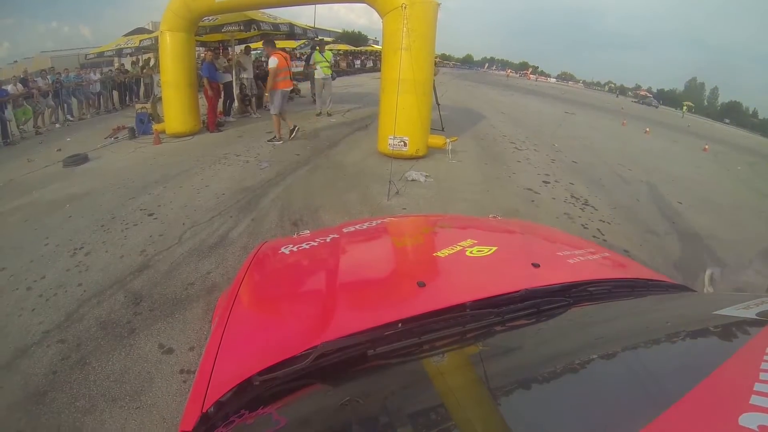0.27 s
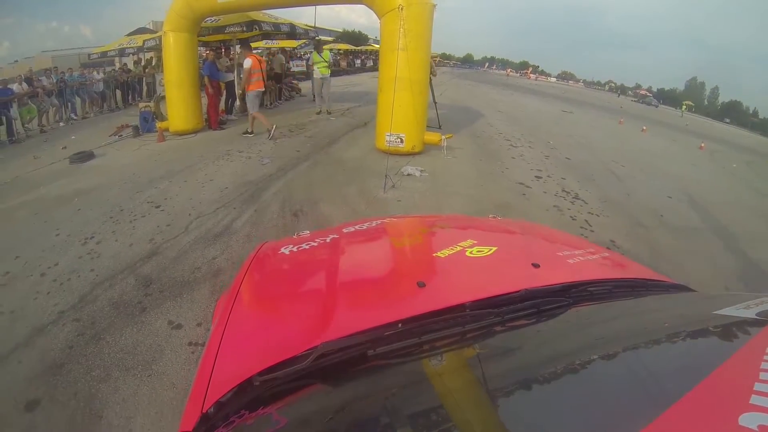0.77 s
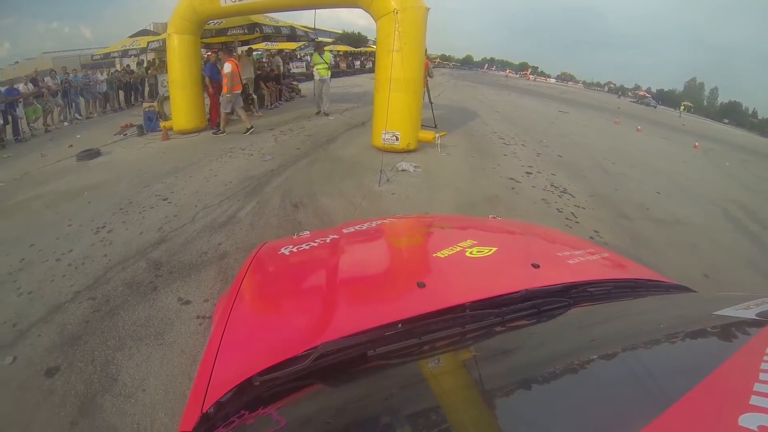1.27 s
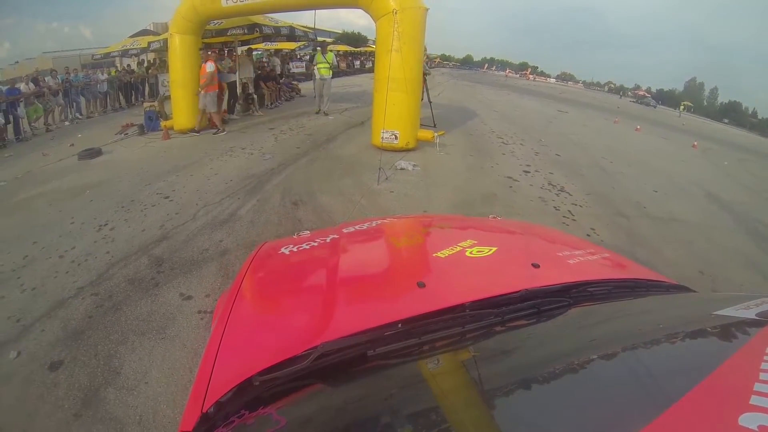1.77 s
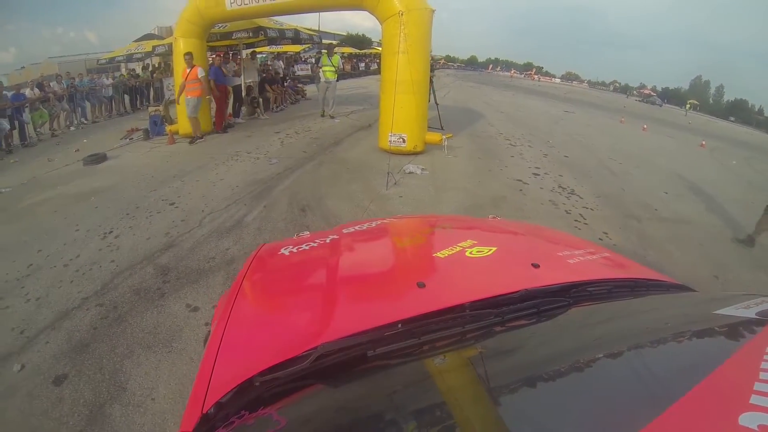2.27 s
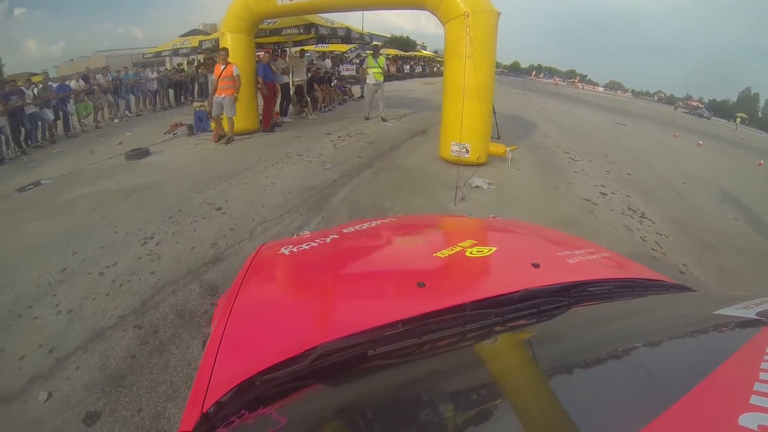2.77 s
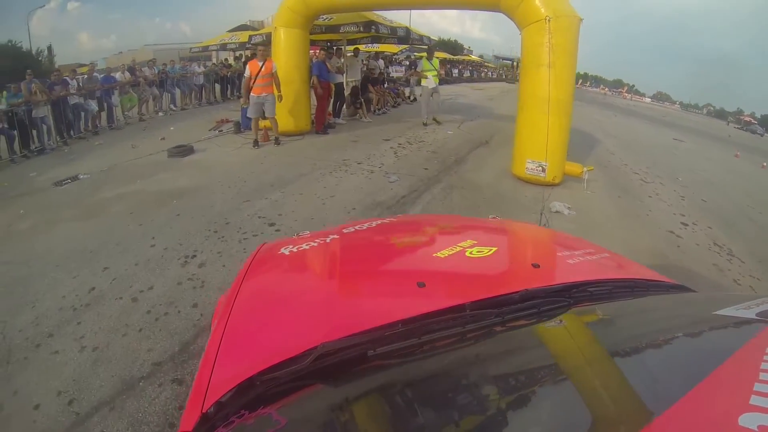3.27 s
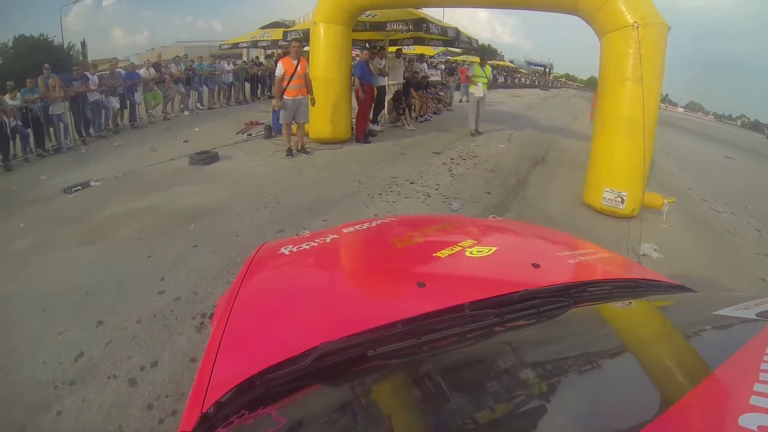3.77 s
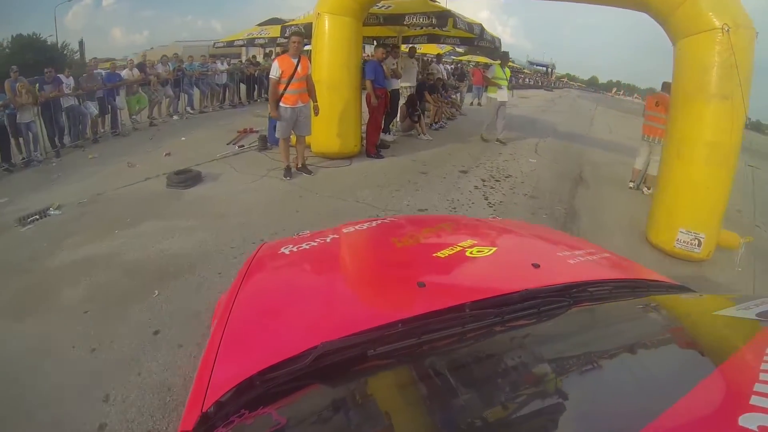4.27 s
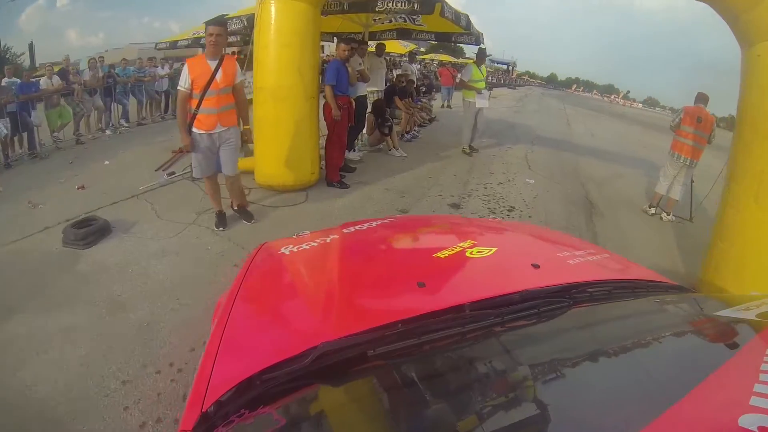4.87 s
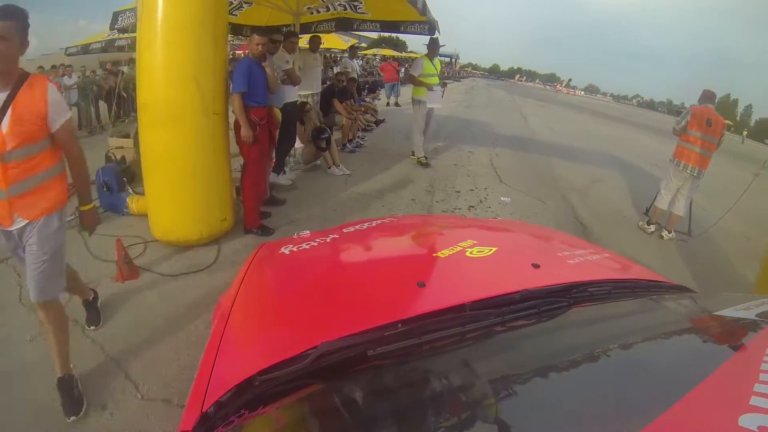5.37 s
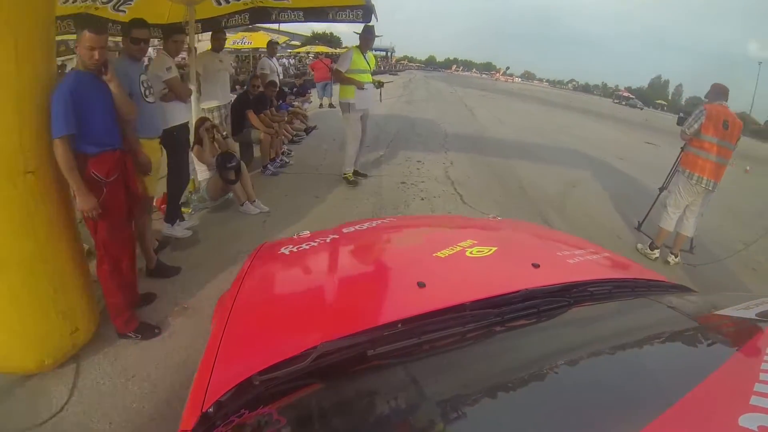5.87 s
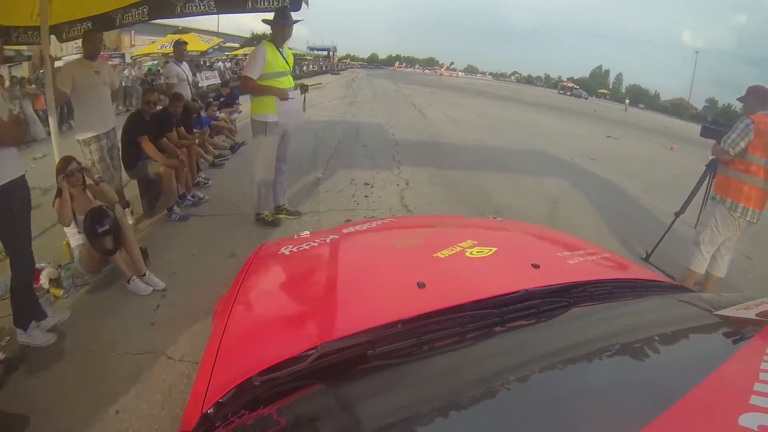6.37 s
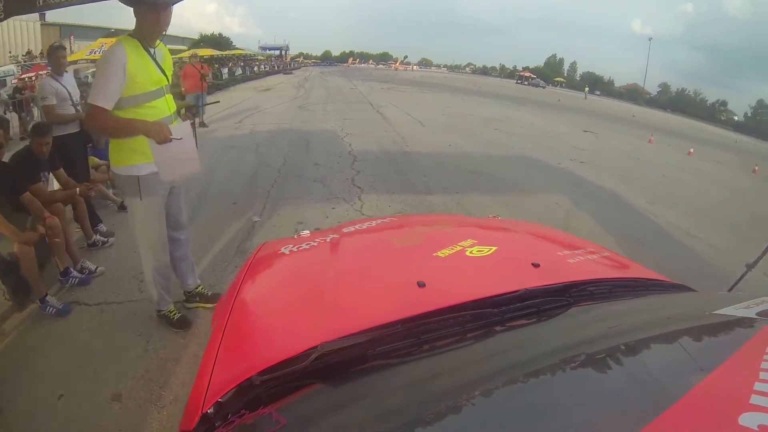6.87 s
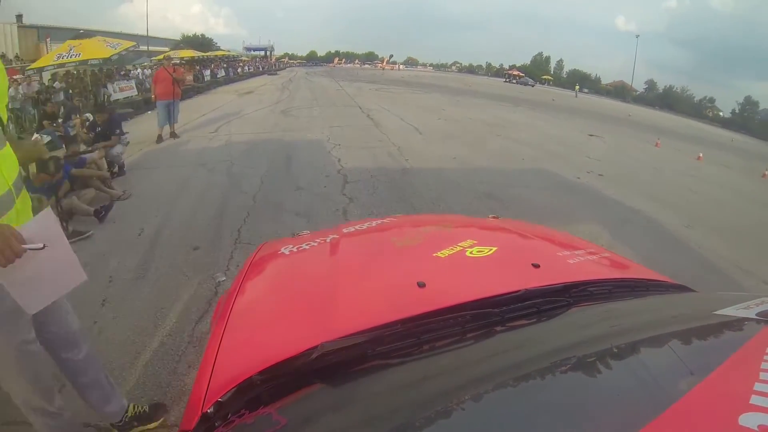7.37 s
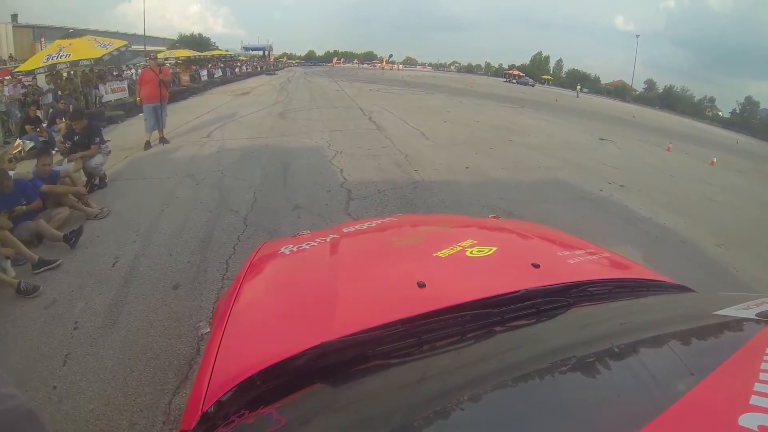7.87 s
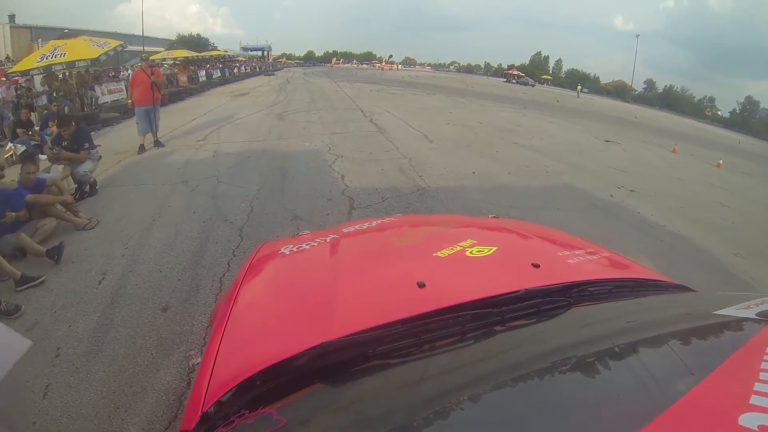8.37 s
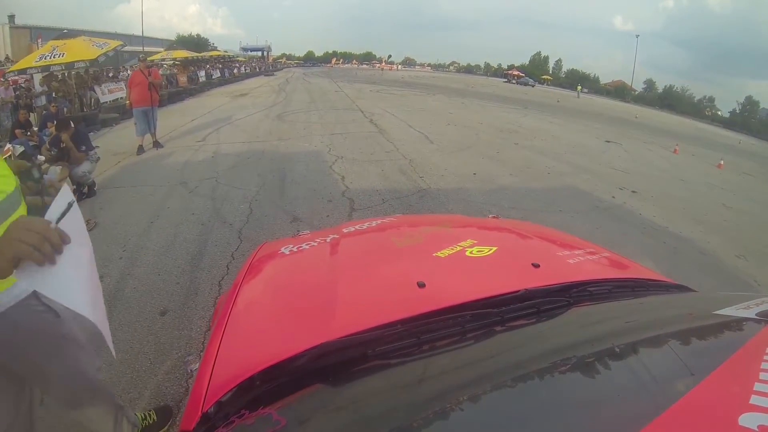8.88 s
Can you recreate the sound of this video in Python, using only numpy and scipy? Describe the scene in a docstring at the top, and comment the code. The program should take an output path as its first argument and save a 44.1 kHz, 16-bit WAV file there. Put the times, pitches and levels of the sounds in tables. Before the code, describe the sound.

A V8 engine surges and relaxes repeatedly as the car creeps forward on rough asphalt. Low body resonance and rumble dominate, with faint blower whine, intake roar and dry tyre friction on top. Around the middle the tyres scrape harder and squeal briefly; a band of fan noise swells by. After one last loud blip the revs fall to quiet, lumpy idling. Close, enclosed roof microphone, open air.

```python
"""A supercharged V8 creeps forward on asphalt: pitch-gliding sines give its blower whine and exhaust boom,
firing pulses ring the body shell, and filtered noise gives intake roar, road rumble and tyre scrub.
It is blipped five times; clicks of grit and thin arched sine squeals come and go, and at 5.5 s
the fan of an inflated arch, a band of noise, swells past. After the last blip the revs drop to idle.
All is heard at a sealed camera on the roof."""
import sys
import numpy as np
from scipy import signal
from scipy.fft import rfft, irfft, next_fast_len
from scipy.io import wavfile
from scipy.ndimage import uniform_filter1d

SR = 44100
rng = np.random.default_rng(int(sys.argv[2]) if len(sys.argv) > 2 else 0)


def master(y):
    """Save y as 16-bit WAV."""
    cut = np.clip(np.atleast_2d(y).T, -1, 1)
    pcm = np.round(cut * 32767)  # scale
    wavfile.write(sys.argv[1], SR, pcm.astype(np.int16))


N = 402191

# Low modes of the body shell. Each row: frequency in Hz, bandwidth in Hz, relative level in dB.
SHELL_MODES = [(42.4, 32, -10.5), (68, 12.6, -3.5), (94.56, 4.74, 5), (117.55, 4.57, 5.5), (153, 10.4, -1),
               (184, 29, -4.5), (254.8, 18.8, -5.5), (294.2, 24.3, -12.5)]
# Lower resonances of the camera case. Each row: frequency in Hz, bandwidth in Hz, relative level in dB.
CASE_LOW_MODES = [(1500, 93, 6), (2300, 120, 3.5), (2470, 23, -3.5), (2760, 220, -8.5), (3127, 84, -6.5),
                  (3170, 120, -9), (3385, 59, -6), (3975, 64, -13)]
# Upper resonances of the camera case. Each row: frequency in Hz, bandwidth in Hz, relative level in dB.
CASE_HIGH_MODES = [(4660, 310, 3.5), (5740, 350, -5.5), (7770, 1030, 4.5), (9380, 1800, -13),
                   (9840, 2400, -6.5), (12800, 370, -12.5), (13900, 940, -10)]


def from_db(db):
    """Amplitude ratio of a level: twenty decibels for each factor of ten."""
    return 10 ** (np.asarray(db) / 20)


def rms_one(x):
    """Normalisation to unit root-mean-square amplitude."""
    return x / np.sqrt(np.mean(x ** 2) + 1e-20)


def in_time(rows):
    """Linear interpolation of table columns over their first, time in seconds; one value a sample."""
    s, *columns = np.transpose(rows)
    return [np.interp(np.arange(N) / SR, s, column) for column in columns]


def drift(rate_hz):
    """Random modulation of unit rms: white noise through a double-pole low-pass at rate_hz."""
    step = 40   # samples between computed values
    r = np.exp(-2 * np.pi * rate_hz * step / SR)
    white = rng.standard_normal(N // step + 2002)
    slow = signal.lfilter([1], [1, -2 * r, r * r], white)[2000:]   # the start-up is dropped
    return np.interp(np.arange(N) / step, np.arange(len(slow)), rms_one(slow))


def coloured(x, spectrum):
    """Spectral shaping: multiplication by a (Hz, dB) curve, straight over log frequency."""
    size = next_fast_len(N)
    hz, db = np.transpose(spectrum)
    log_hz = np.log(np.arange(size // 2 + 1) * SR / size + 1)   # 1 Hz added to keep the log finite
    gain = from_db(np.interp(log_hz, np.log(hz), db, left=-90))
    return irfft(rfft(x, size) * gain, size)[:N]


def noise(spectrum, flicker_db, rate_hz):
    """Amplitude-modulated noise: white noise of flickering level, coloured and set to unit rms."""
    white = rng.standard_normal(N) * from_db(flicker_db * drift(rate_hz))
    return rms_one(coloured(white, spectrum))


def tone(hz, db):
    """Frequency modulation: a sine whose phase integrates a moving pitch, at an rms level in dB."""
    return np.sqrt(2) * from_db(db) * np.sin(2 * np.pi * np.cumsum(hz) / SR)


def butterworth(x, order, hz, kind="low"):
    """Maximally flat filtering with cutoffs in Hz."""
    return signal.sosfilt(signal.butter(order, hz, kind, fs=SR, output="sos"), x)


def resonate(x, modes, sign=1):
    """Modal superposition of two-pole resonators; like signs leave notches between, sign -1 fills them."""
    out = 0
    for k, (hz, width_hz, db) in enumerate(modes):
        r = np.exp(-np.pi * width_hz / SR)
        poles = [1, -2 * r * np.cos(2 * np.pi * hz / SR), r * r]
        zeros = [(1 - r * r) / 2, 0, (r * r - 1) / 2]
        out = out + sign ** k * from_db(db) * signal.lfilter(zeros, poles, x)
    return out


def shell(x):
    """Modal ringing of the body shell: a few low modes under a steep low-pass."""
    return butterworth(resonate(x, SHELL_MODES, sign=-0.97), 6, 345)


def boom(x):
    """Resonance under steady tones: they swell on each shell mode; the two strongest cancel between them."""
    ringing = resonate(x, SHELL_MODES[:4]) - resonate(x, SHELL_MODES[4:], sign=-1.01)
    return butterworth(ringing, 6, 320)


def controls():
    """Throttle as a first-order lag behind the rate at which the revs climb, with whine pitch and load."""
    # Engine speed, heard as the blower's whine, and load on the crank.
    # Each row: time in seconds, whine in Hz, firing tone level before the shell in dB.
    engine_course = [(0, 147.7, -28.5), (.08, 165.7, -45), (.17, 220.8, -25), (.3, 322.4, -12.5),
                     (.41, 404, -15.5), (.52, 494, -10.5), (.61, 523, -16), (.7, 519, -29.5),
                     (.93, 465, -23), (1.13, 410, -22.5), (1.25, 377.8, -19), (1.37, 337.1, -21.5),
                     (1.55, 296, -24.5), (1.72, 272, -48), (1.92, 257.4, -37), (2.04, 304.4, -17),
                     (2.19, 398.6, -11), (2.33, 524, -9.5), (2.46, 531, -16.5), (2.57, 497, -29.5),
                     (2.74, 414, -26), (2.82, 391, -26), (2.92, 367.1, -37), (3.2, 307, -27),
                     (3.29, 316.8, -21.5), (3.5, 455.2, -12), (3.6, 496, -11), (3.68, 500, -28.5),
                     (3.8, 488.6, -21), (4.06, 463.4, -30.5), (4.15, 442.6, -18), (4.3, 415, -20),
                     (4.41, 392.4, -14.5), (4.5, 373.3, -47), (4.61, 353, -19.5), (4.77, 378, -27),
                     (4.89, 431.5, -14.5), (5.05, 527, -14), (5.15, 541, -15), (5.32, 538.6, -31.5),
                     (5.52, 481, -29.5), (5.85, 383.5, -15.5), (6.03, 356, -21.5), (6.15, 421, -17),
                     (6.31, 571, -5), (6.39, 590, -16), (6.55, 563, -26.5), (6.84, 527, -22.5),
                     (7.03, 486.3, -22.5), (7.4, 383, -16.5), (7.58, 336.3, -13.5), (7.8, 290, -27.5),
                     (7.95, 265, -43), (8.4, 232.4, -50), (8.8, 203, -48), (9.12, 199.6, -45)]
    full_throttle_hz_per_s, throttle_lag_s = 1060, 0.055   # climb of the whine with the throttle wide open
    whine_hz, tone_db = in_time(engine_course)
    whine_hz = uniform_filter1d(whine_hz, size=1500)
    climb_hz_per_s = np.gradient(whine_hz) * SR
    opening = np.clip(climb_hz_per_s / full_throttle_hz_per_s, 0, 1)
    r = np.exp(-1 / (throttle_lag_s * SR))
    throttle = signal.lfilter([1 - r], [1, -r], opening)
    return whine_hz, tone_db, throttle


def level_db(whine_hz, throttle, mid_db, throttle_db, octave_db):
    """Source level linear in throttle and in octaves of engine speed about a 400 Hz whine."""
    return mid_db + throttle_db * throttle + octave_db * np.log2(whine_hz / 400)


def blower(whine_hz, throttle):
    """Rotor whine as a gliding sine through the bonnet, and a pulley tone filtered by one panel mode."""
    # Whine level through the bonnet. Each row: pitch in Hz, level in dB.
    bonnet_response = [(200, -58.5), (255, -36.5), (300, -55.5), (350, -51.5), (385, -52.5), (420, -41),
                       (465, -40.5), (487, -42.5), (520, -54.5), (545, -37.5), (568, -43.5), (592, -31.5)]
    whine_db = np.interp(whine_hz, *np.transpose(bonnet_response))
    whine_db = whine_db - 3 * throttle   # fainter while the revs climb
    whine = tone(whine_hz, whine_db + 2.3 * drift(20))
    pulley_ratio, pulley_db = 1.4, -57   # a faster pulley beside the blower; level before the panel
    pulley = tone(whine_hz * pulley_ratio, pulley_db + 4 * drift(3))
    panel = [(430, 110, 0)]   # Hz, width in Hz, dB
    return whine + resonate(resonate(pulley, panel), panel)


def firing_tones(firing_hz, tone_db, whine_hz, throttle):
    """Harmonics of the firing rate: the first two excite shell modes, the third barks under throttle."""
    octave_db = level_db(whine_hz, throttle, mid_db=-30.5, throttle_db=10.5, octave_db=-0.74)
    # the silencer takes the octave at high revs: 0.15 dB per Hz above 270 Hz
    octave_db = octave_db - .15 * np.maximum(2 * firing_hz - 270, 0)
    third_db = level_db(whine_hz, throttle, mid_db=-65, throttle_db=20, octave_db=3)
    low_tones = tone(firing_hz, tone_db) + tone(2 * firing_hz, octave_db)
    return boom(low_tones) + tone(3 * firing_hz, third_db + 3 * drift(25))


def exhaust(firing_hz, beat_db, rough_db):
    """Impulse excitation of the shell: one pulse per firing, its strength by cylinder and by chance."""
    # Two banks fire unevenly: one relative pulse level in dB for each of eight successive firings.
    cylinder_levels = [-10.5, -10.5, -12.5, -19, 2, -11, -16.5, 8.5]
    count = np.floor(np.cumsum(firing_hz) / SR).astype(int)
    strength = from_db(np.array(cylinder_levels)[count % 8] + rough_db * rng.uniform(-1.2, 1, N))
    pulses = np.diff(count, prepend=0) * strength / np.sqrt(firing_hz)   # even power at any speed
    return shell(from_db(beat_db) * rms_one(pulses)) * from_db(18.5)


def intake(firing_hz, throttle):
    """Periodic amplitude modulation of flow noise: the intake gulps once a firing."""
    # Spectrum of the roar. Each row: frequency in Hz, relative density in dB per Hz.
    roar_spectrum = [(200, 12), (300, -2), (400, -6), (520, -4.5), (800, -16.5), (1040, -17.5),
                     (1300, -62.5)]
    # Intake roar between blips. Each row: time in seconds, relative level in dB.
    roar_course = [(0.0, -64), (0.69, -52.5), (1.73, -57.5), (2.39, -51), (2.84, -56.5), (5.44, -51.5),
                   (5.81, -54.5), (6.73, -51), (7.85, -62), (9.12, -66)]
    roar_db = in_time(roar_course)[0] + 14 + 4 * throttle
    rasp = 1 + 0.48 * np.cos(2 * np.pi * np.cumsum(firing_hz) / SR)
    return from_db(roar_db) * rasp * noise(roar_spectrum, flicker_db=2.0, rate_hz=7.4)


def rolling(rumble_db):
    """Random excitation of modes: engine and rough asphalt shake the shell, and the mount shudders."""
    # Low thrum of the shell as the car rolls. Each row: time in seconds, relative level in dB.
    thrum_course = [(0, -46), (.4, -35.5), (3.5, -32), (3.7, -32), (4.0, -31.5), (4.95, -40), (5.3, -24),
                    (5.72, -24), (5.9, -26.5), (6.3, -25.5), (6.45, -20.5), (6.65, -29.5), (7.2, -31),
                    (7.9, -46.5), (8.5, -45), (9.12, -54)]
    # Shudder of the mount. Each row: time in seconds, relative level in dB.
    shudder_course = [(0.0, -29), (0.3, -32.5), (0.78, -28), (0.94, -49), (1.09, -31), (2.39, -40.5),
                      (3.81, -23), (4.11, -33), (4.21, -22.5), (4.57, -21.5), (4.75, -47), (4.88, -25),
                      (7.47, -30), (7.54, -37), (8.05, -28), (8.18, -36), (8.56, -30), (9.12, -29)]
    rumble = shell(from_db(rumble_db) * rng.standard_normal(N)) * from_db(31.5)
    thrum = rms_one(resonate(rng.standard_normal(N), SHELL_MODES[1:3], sign=-1))
    thrum = from_db(in_time(thrum_course)[0] + 1.0) * thrum
    shudder_db = in_time(shudder_course)[0]
    jolts = rms_one(resonate(rng.standard_normal(N), [(27, 7.3, 0)]))   # a 27 Hz mode
    jolts = from_db(shudder_db - 14.5) * jolts
    sway_hz = 16.5 * (1 + 0.082 * drift(1.5))
    sway = tone(sway_hz, shudder_db + 1.5 + 1.0 * drift(3))
    return rumble + thrum + jolts + sway


def scrub_level():
    """Envelope of tyre friction in dB: each scrub rises, sags while it lasts and dies away fast."""
    # Tyre scrubs. Each row: start, peak and end in seconds, relative level in dB, sag by the end in dB.
    scrub_rows = [(-.1, 0, 1.47, -48.5, 1), (1.775, 1.8, 1.93, -40, 3), (2.17, 2.21, 2.5, -40, 11),
                  (2.45, 2.87, 3.48, -43.5, 3), (3.47, 3.5, 3.6, -52, 6), (3.96, 4.0, 4.22, -51, -3),
                  (4.22, 4.245, 4.33, -38, -4), (4.23, 4.39, 4.62, -30, 8), (4.6, 4.64, 4.74, -44, 5),
                  (4.78, 4.9, 5.2, -46, -3), (5.2, 5.45, 5.7, -42, 3), (5.7, 5.8, 6.2, -48, 4)]
    floor_db, rise_db, release_db_per_s = -58.5, 14.5, 279.5
    s, db = np.arange(N) / SR, np.full(N, float(floor_db))
    for start, peak, end, top_db, sag_db in scrub_rows:
        shape_db = np.interp(s, [start, peak, end, end + 1],
                             [-rise_db, 0, -sag_db, -sag_db - release_db_per_s], left=-99)
        db = np.maximum(db, top_db + shape_db)
    return db


def tyre_scrub(scrub_db):
    """Friction noise exciting the resonances of the case; its treble changes with scrub level."""
    # treble against the body of the scrub: -18 dB at a scrub of -47.5 dB, rising on both sides of it
    above, below = np.maximum(scrub_db + 47.5, 0), np.maximum(-47.5 - scrub_db, 0)
    sizzle_db = -18 + 0.47 * above + 0.16 * below
    grit = rng.standard_normal(N) * from_db(0.76 * drift(40))
    body = butterworth(grit, 4, [1200, 4150], "band")
    upper_body = from_db(0.48 * (sizzle_db + 16.5)) * resonate(body, CASE_LOW_MODES[2:])
    low = resonate(body, CASE_LOW_MODES[:2]) + upper_body
    high = resonate(butterworth(grit, 4, 4400, "high"), CASE_HIGH_MODES, sign=-0.85)
    return from_db(scrub_db - 1.0) * (rms_one(low) + from_db(sizzle_db) * rms_one(high))


def engine_bay(firing_hz, scrub_db):
    """Broadband hiss with amplitude modulation at the firing rate."""
    # Spectrum of the bay. Each row: frequency in Hz, relative density in dB per Hz.
    bay_spectrum = [(900, -46), (1130, -16), (1350, 5), (1500, 1.5), (1950, -11.5), (2300, -9.5),
                    (3400, -19), (4300, -38), (8000, -37.5), (15000, -52.5)]
    # Engine bay hiss. Each row: time in seconds, relative level in dB.
    bay_course = [(0.0, -48.5), (0.58, -46), (1.7, -47.5), (1.83, -43), (3.2, -46), (3.55, -46),
                  (3.96, -45.5), (4.42, -32), (4.55, -40), (4.72, -42), (4.95, -42.5), (5.23, -40),
                  (5.44, -35), (5.64, -35.5), (6.02, -42.5), (6.5, -40), (7.72, -48.5), (9.12, -48)]
    pulsing = 1 + 0.043 * np.cos(2 * np.pi * np.cumsum(firing_hz) / SR)
    # the scrub comes up through the bay too
    strength = from_db(in_time(bay_course)[0] - 2.5) + from_db(scrub_db - 12)
    return strength * pulsing * noise(bay_spectrum, flicker_db=1.08, rate_hz=16)


def ticks():
    """Impulse response: grit strikes as clicks with scratchy tails, ringing case and panel."""
    # Grit striking the car. Each row: time in seconds, relative peak level in dB.
    grit_strikes = [(.3905, -36), (.4015, -35), (.4118, -31), (1.4585, -44), (3.5339, -40), (3.892, -31),
                    (3.9704, -36), (4.147, -42)]
    # Modes of the struck panel. Each row: frequency in Hz, bandwidth in Hz, relative level in dB.
    panel_modes = [(800, 700, 2), (2900, 1300, -1), (6000, 720, -4)]
    clicks = np.zeros(N)
    for s, db in grit_strikes:
        clicks[round(s * SR)] = from_db(db)
    r = np.exp(-1 / (.001 * SR))   # the tail decays in 1 ms
    tail = signal.lfilter([1], [1, -r], clicks) * rng.standard_normal(N)
    clicks = clicks + .25 * tail
    case_low = from_db(19.0) * resonate(clicks, CASE_LOW_MODES, sign=-1.25)
    case_high = from_db(7.5) * resonate(clicks, CASE_HIGH_MODES[1:], sign=-0.82)
    panel = from_db(17.5) * resonate(clicks, panel_modes, sign=-0.88)
    return case_low + case_high + panel


def squeals():
    """Frequency and amplitude modulation: wavering sines on arched pitches, loudest in the middle."""
    # Thin squeals. Each row: start in seconds, length in seconds, first, middle and last pitch in Hz,
    # mean level at the middle in dB.
    squeal_rows = [(1.256, 0.043, 1958, 1891, 1800, -48), (1.305, 0.2, 1590, 1653, 1563, -47.5),
                   (4.0, .32, 310, 363, 392.5, -48), (4.082, .5, 690, 802, 628, -52),
                   (4.226, 0.25, 1170, 1218, 1160, -42), (4.641, .15, 1310, 1358, 1384, -37.5),
                   (4.95, .67, 656, 742, 709, -47.5), (5.18, 0.26, 2000, 2043, 2049, -47.5),
                   (7.901, 1.3, 1410, 1412, 1408, -54)]
    edge_db, fade_s = -11, 0.0098   # ends against the middle; fade in and out
    out, s = 0, np.arange(N) / SR
    for start, length, first_hz, middle_hz, last_hz, db in squeal_rows:
        u = np.clip(2 * (s - start) / length - 1, -1, 1)   # -1 at the start, 1 at the end
        slope_hz = (last_hz - first_hz) / 2
        bend_hz = (first_hz + last_hz) / 2 - middle_hz
        hz = middle_hz + u * slope_hz + u * u * bend_hz
        fade = np.clip((1 - np.abs(u)) * length / 2 / fade_s, 0, 1)
        wavering_hz = hz * (1 + 0.00299 * drift(24.5))
        out = out + fade * tone(wavering_hz, db + edge_db * u * u + 3.0 * drift(26))
    return out


def arch_fan():
    """Broadband fan noise whose level swells and falls as the inflated arch slides past."""
    # Spectrum of the fan. Each row: frequency in Hz, relative density in dB per Hz.
    fan_spectrum = [(530, -50), (900, -28), (1140, -13.5), (1350, -17), (1520, 0.5), (1930, -14.5),
                    (2200, -16.5), (5110, -22), (6640, -29), (7940, -31), (9490, -36.5), (10800, -39),
                    (11500, -33.5), (12300, -37.5), (13400, -40.5), (15400, -41.5)]
    # Passing of the fan. Each row: time in seconds, level in dB.
    fan_course = [(4.7, -60), (5.0, -52), (5.5, -36.5), (6.0, -44), (6.6, -54.5), (7.5, -58.5)]
    return from_db(in_time(fan_course)[0]) * noise(fan_spectrum, flicker_db=0.8, rate_hz=24)


def scene():
    """Linear superposition of all sources at one microphone."""
    whine_hz, tone_db, throttle = controls()
    # the firing pitch trails the blower by 0.04 s; the whine turns 3.4 times a firing
    firing_hz = np.interp(np.arange(N) - .04 * SR, np.arange(N), whine_hz) / 3.4
    beat_db = level_db(whine_hz, throttle, mid_db=-37.5, throttle_db=9.2, octave_db=2.2)
    rumble_db = level_db(whine_hz, throttle, mid_db=-34.5, throttle_db=8.8, octave_db=4.04)
    scrub_db = scrub_level()
    engine = blower(whine_hz, throttle) + firing_tones(firing_hz, tone_db, whine_hz, throttle)
    engine = engine + exhaust(firing_hz, beat_db + 3 * drift(4.6), rough_db=3.5)
    engine = engine + intake(firing_hz, throttle)
    road = rolling(rumble_db) + tyre_scrub(scrub_db)
    hiss = engine_bay(firing_hz, scrub_db) + arch_fan()
    return (engine + road + hiss + ticks() + squeals())[None]


def record(dry):
    """Low-pass response: the capsule fades above 14.7 kHz, then a steep stopband from 15.6 kHz cuts the top."""
    soft = butterworth(dry, 8, 14700)
    return signal.sosfilt(signal.cheby2(12, 50, 15600, fs=SR, output="sos"), soft)


dry = scene()
out = record(dry)
master(out)
```